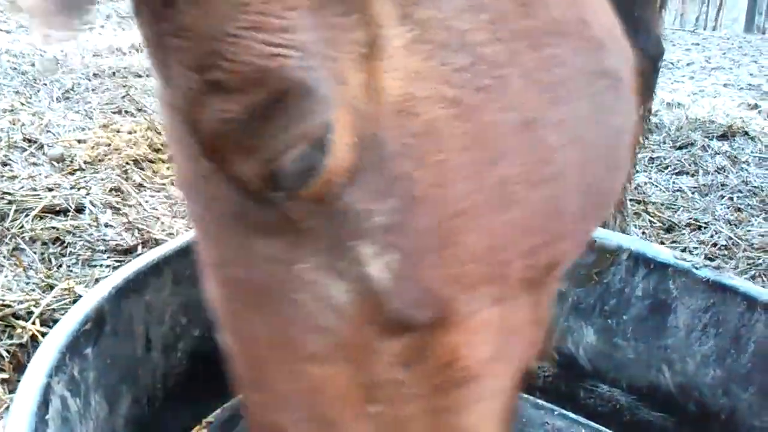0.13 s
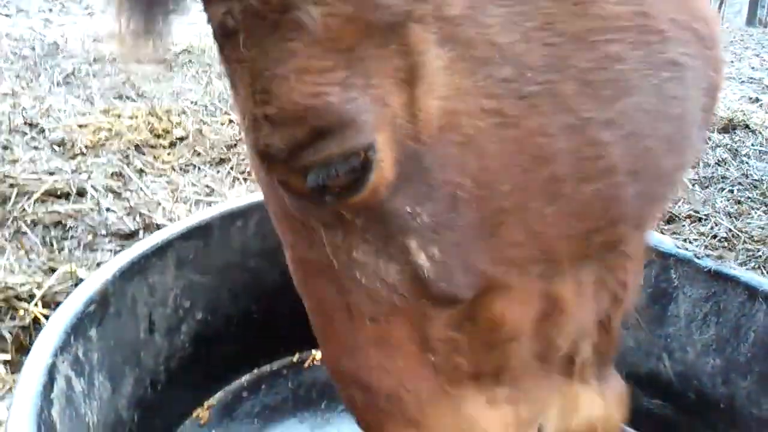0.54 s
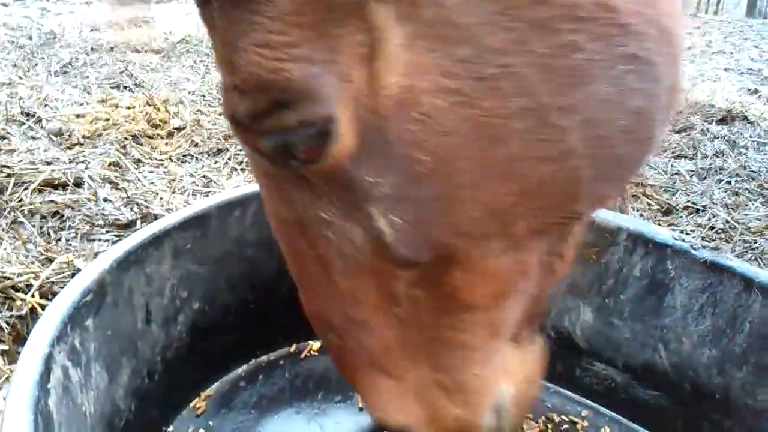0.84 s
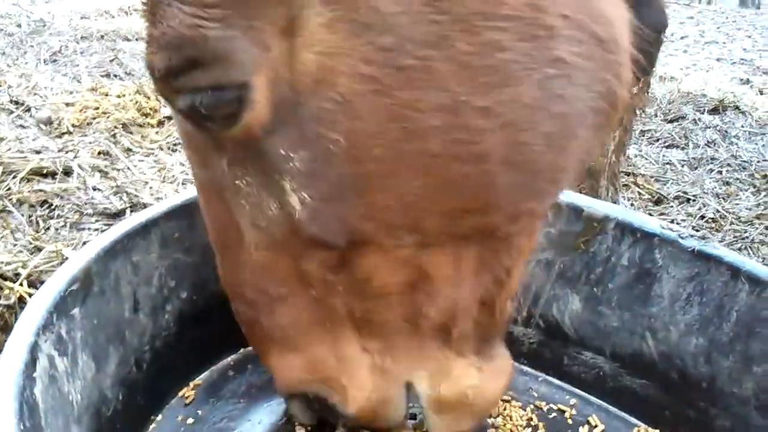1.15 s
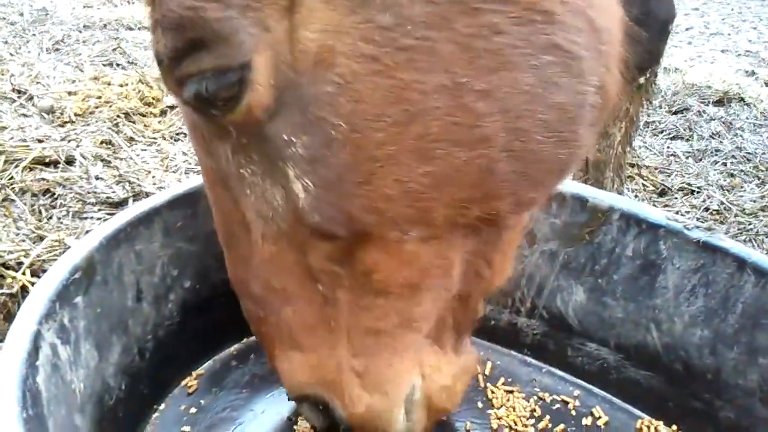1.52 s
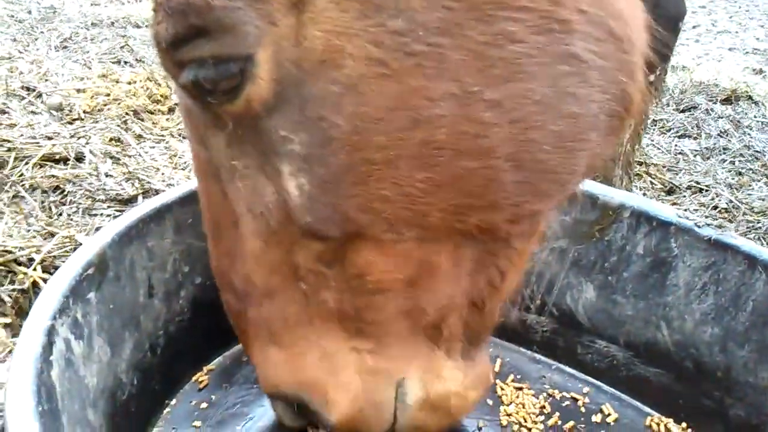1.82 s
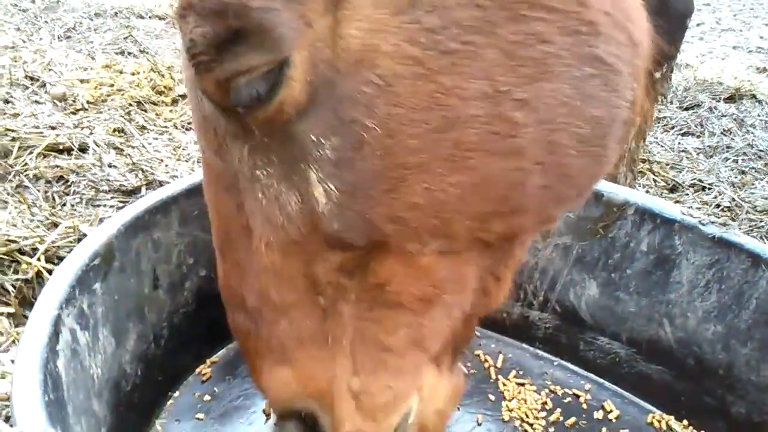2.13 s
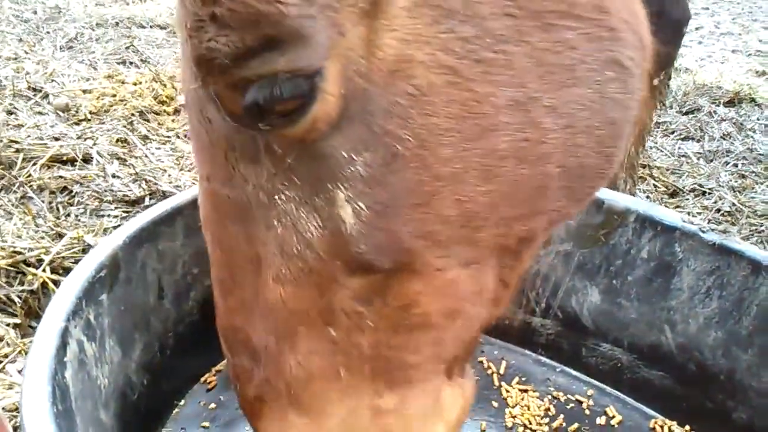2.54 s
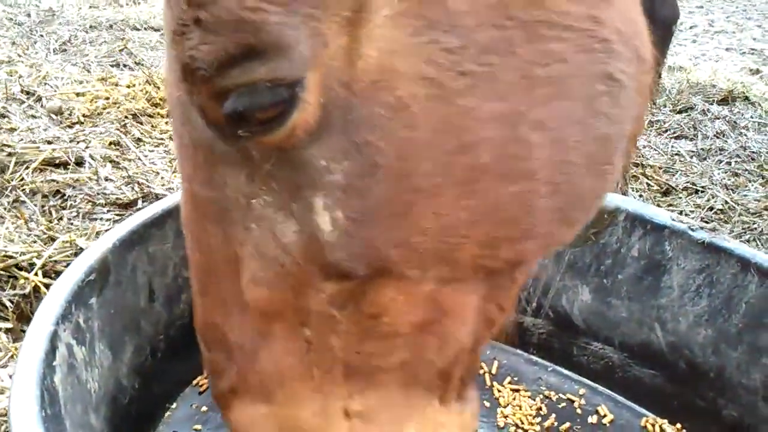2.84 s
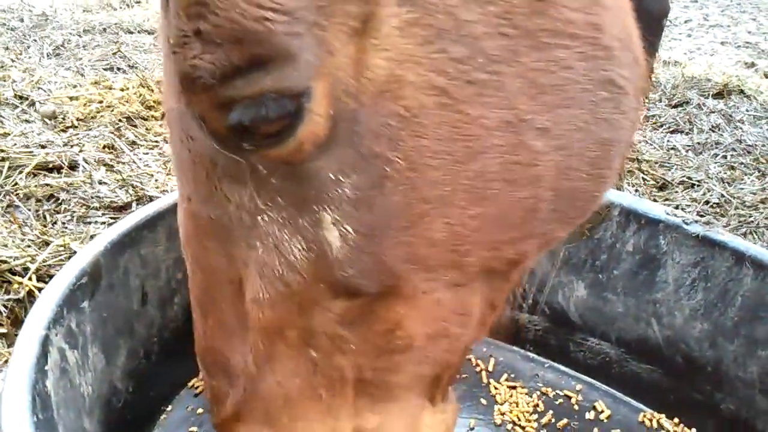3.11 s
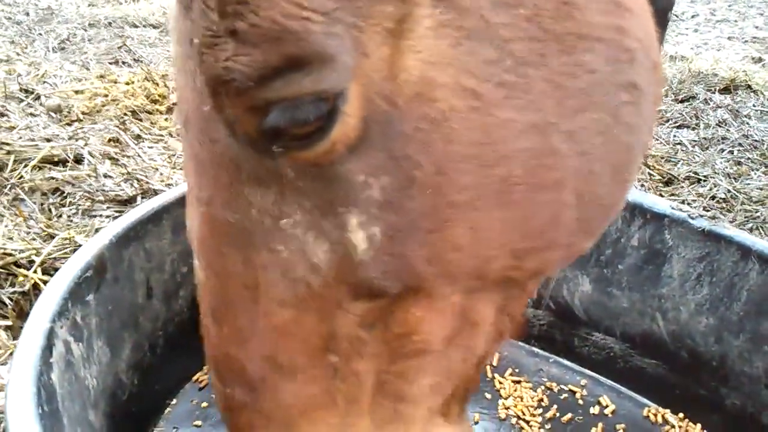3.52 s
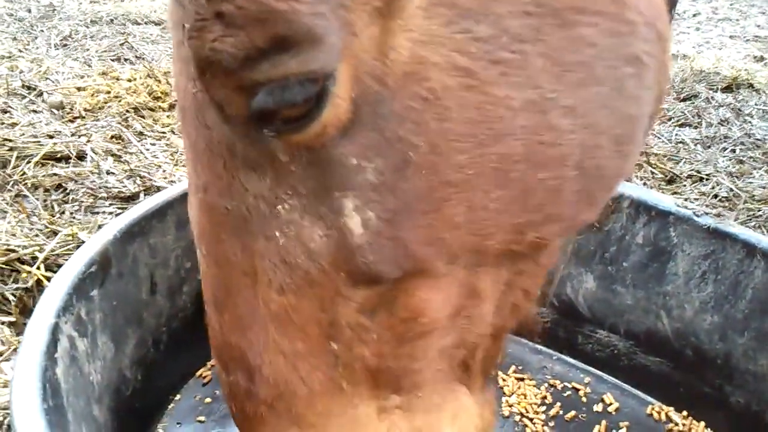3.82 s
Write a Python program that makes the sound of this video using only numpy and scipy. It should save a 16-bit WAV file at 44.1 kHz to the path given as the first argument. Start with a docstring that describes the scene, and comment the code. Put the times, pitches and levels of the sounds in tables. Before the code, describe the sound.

A horse crunches hard feed pellets from a plastic tub, with rattles, scrapes and one knock.

```python
"""Outdoors, close to the microphone: a horse mouths feed pellets off the floor of a plastic tub.
Pellets grind, crush, crack, rattle and tick: random or listed clicks ringing short resonances.
The muzzle rubs, shoves and once bumps the tub floor; one knock, with a bright click, rings the tub.
A thin sine whistles twice in quick succession, gliding up, then down; shaped noise is the air's hiss."""
import sys
import numpy as np
from scipy import signal
from scipy.fft import rfft, irfft
from scipy.io import wavfile

SR = 44100
rng = np.random.default_rng(int(sys.argv[2]) if len(sys.argv) > 2 else 0)


def master_out(mix):
    """Clip the mix to full scale and print it as 16-bit PCM to the path in sys.argv[1]."""
    frames = np.transpose(np.atleast_2d(mix))
    ceiling = np.clip(frames, -1, 1)
    pcm = np.round(ceiling * 32767).astype(np.int16)
    wavfile.write(sys.argv[1], SR, pcm)


def attenuation_scalar(level_db):
    """Turn a level in dB into a linear amplitude multiplier (20 dB per decade)."""
    decades = np.asarray(level_db, float) / 20
    return 10 ** decades


N = 174195


def rms_one(x):
    """Scale to rms 1."""
    return x / np.sqrt(np.mean(x ** 2) + 1e-20)


def in_time(rows):
    """Interpolate curve columns at every sample."""
    s, *columns = np.transpose(rows)
    return [np.interp(np.arange(N) / SR, s, c) for c in columns]


def at_hz(points, hz):
    """Read a spectrum in dB, interpolated over log frequency."""
    points = np.array(points)
    return np.interp(np.log(hz), np.log(points[:, 0]), points[:, 1])


def drift(rate_hz):
    """Slow random wander of rms 1: noise through a two-pole lowpass."""
    r = np.exp(-2 * np.pi * rate_hz / SR)
    wander = signal.lfilter([1], [1, -2 * r, r * r], rng.standard_normal(N + SR))
    return rms_one(wander[SR:])  # first second dropped while the filter settles


def ring(clicks, hz, t60_s):
    """Resonator: a unit click starts a decaying sine of height about 1."""
    r = attenuation_scalar(-60 / (t60_s * SR))
    w = 2 * np.pi * min(hz, SR / 2.2) / SR
    return signal.lfilter([0, np.sin(w)], [1, -2 * r * np.cos(w), r * r], clicks + 1e-18)


def soften(x, contact_s):
    """A soft contact spreads a click in time."""
    r = np.exp(-1 / (contact_s * SR))
    return signal.lfilter([(1 - r) ** 2], [1, -2 * r, r * r], x)


def add(out, start_s, piece):
    """Mix a piece in at its start time."""
    i = int(start_s * SR)
    out[i:i + len(piece)] += piece[:len(out) - i]


def grains(colour, shared, per_s, spread_db, cycles, clump_db, clump_hz, count, size):
    """Clumped random clicks, each ringing at neighbouring pitches, 60 dB down after `cycles`; rms 1."""
    sizes = attenuation_scalar(spread_db * np.minimum(rng.exponential(1, N), 4)) * rng.choice([-1, 1], N)
    clumping = .7 * shared + .7 * drift(clump_hz)
    born = rng.random(N) < per_s * attenuation_scalar(clump_db * clumping) / SR
    pitches_hz = np.geomspace(colour[0][0], colour[-1][0], count)
    dealt = rng.integers(0, count, N)
    out = np.zeros(N)
    for k, hz in enumerate(pitches_hz):
        clicks = sizes * born * (abs(dealt - k) <= size) * rng.normal(0, 1, N)
        tone = rms_one(ring(clicks, hz, cycles / hz))
        out += attenuation_scalar(at_hz(colour, hz)) * tone * np.sqrt(hz)  # bandwidth grows with pitch
    return rms_one(out)


def bursts(rows, t60_s, bits_s, snap_db, snap_hz):
    """Each burst: a main click and later splinters ring at three pitches, plus a broad noise snap."""
    snap_s, snap_contact_s = .0007, .00002
    out = np.zeros(N)
    draws = rng.random((len(rows), 3, 6))
    highpass = signal.butter(1, snap_hz, "high", fs=SR)
    puffs = rng.standard_normal((len(rows), 300)) * np.exp(-np.arange(300) / (snap_s * SR))
    for (start_s, peak_db, hz), (when, size, detune), puff in zip(rows, draws, puffs):
        clicks = np.zeros(SR // 10)
        later_s = -np.log(1 - .95 * when) * bits_s * (np.arange(6) > 0)
        heights = np.where(later_s > 0, (2 * size - 1) * 0.69, 1)
        np.add.at(clicks, (later_s * SR).astype(int), heights)
        body = ring(clicks, hz, t60_s)
        body += 0.22 * ring(clicks, hz * (1.25 + 0.29 * detune[0]), 1.35 * t60_s)
        body -= 0.25 * ring(clicks, hz * (0.73 + 0.12 * detune[1]), 0.79 * t60_s)
        snap = soften(signal.lfilter(puff, [1], clicks), snap_contact_s)
        snap = signal.lfilter(*highpass, snap)
        piece = body / np.abs(body).max() + attenuation_scalar(snap_db) * snap
        add(out, start_s, attenuation_scalar(peak_db) * piece)
    return out


def level(curve, efforts, release_s, column, below_db=0):
    """Slowly changing level plus efforts that rise, hold and fade, summed in power."""
    attack_s = 0.0035
    t = np.arange(N) / SR
    power = attenuation_scalar(2 * in_time(curve)[0])
    for row in efforts:
        start_s, length_s = row[:2]
        rise = np.clip((t - start_s) / attack_s, 0, 1)
        fade = np.exp(-np.maximum(t - start_s - length_s, 0) / release_s)
        power = power + (attenuation_scalar(row[column] + below_db) * rise * fade) ** 2
    return np.sqrt(power)


# air spectrum: freq_hz, density_db (relative, per Hz)
AIR_COLOUR = [(25, -31), (55, -2.5), (250, -6.5), (850, -9.5), (1710, -14.5), (2630, -25), (4150, -9),
              (4870, -18.5), (6210, -11), (8350, -20), (15500, -17)]
# air level: time_s, level_db
AIR_LEVEL = [(0, -51.5), (1, -50.5), (1.3, -47.5), (3.95, -45.5)]


def air():
    """Open-air hiss and rumble: spectrally shaped noise, slowly swelling."""
    hz = np.maximum(np.fft.rfftfreq(N, 1 / SR), 1)
    spectrum = rfft(rng.standard_normal(N)) * attenuation_scalar(at_hz(AIR_COLOUR, hz))
    return attenuation_scalar(in_time(AIR_LEVEL)[0]) * rms_one(irfft(spectrum, N))


# two whistle glides, parted by a dip: time_s, pitch_hz, level_db
WHISTLE_GLIDES = [(2.45, 8300, -62), (2.57, 8950, -62), (2.63, 9850, -57), (2.65, 9900, -80),
                  (2.675, 8600, -58), (2.72, 8050, -57), (2.765, 8040, -51), (2.81, 8000, -66)]


def whistle():
    """Faint sine of wavering level, gliding up, then down after a dip."""
    pitch_hz, level_db = in_time(WHISTLE_GLIDES)
    t = np.arange(N) / SR
    on = (t > WHISTLE_GLIDES[0][0]) & (t < WHISTLE_GLIDES[-1][0])
    sine = np.sin(2 * np.pi * np.cumsum(pitch_hz) / SR) * np.sqrt(2)  # rms 1
    return on * attenuation_scalar(level_db + 2.5 * drift(40)) * sine


# tub wall modes: pitch_hz, level_db (relative), t60_s
TUB_MODES = [(665, 16, 0.036), (803, 16.5, 0.034), (1060, 15, 0.038)]


def knock():
    """One firm blow rings the tub wall modes."""
    start_s, peak_db, contact_s = 1.3683, -11, .0002
    out = np.zeros(N)
    blow = soften(np.eye(1, SR // 5)[0], contact_s)
    rings = sum(attenuation_scalar(db) * ring(blow, hz, t60_s) for hz, db, t60_s in TUB_MODES)
    rings = signal.lfilter(*signal.butter(2, 350, "high", fs=SR), rings)
    add(out, start_s, attenuation_scalar(peak_db) * rings / np.abs(rings).max())
    return out


# slowly changing rub level beneath the shoves: time_s, level_db
RUB_LEVEL = [(0, -48.5), (.5, -55), (.65, -52), (.9, -40.5), (1.3, -50), (1.7, -41.5), (2.55, -51.5),
             (3.1, -44), (3.95, -59.5)]
# rub spectrum: freq_hz, density_db (relative)
RUB_COLOUR = [(170, -10), (205, -2.5), (260, -0.5), (340, -7)]
# muzzle shoves on the tub floor: start_s, length_s, level_db
SHOVES = [(0.148,0.071,-41), (0.3,0.25,-41.5), (0.754,0.022,-31.5), (0.951,0.078,-37), (1.409,0.038,-41),
          (1.567,0.038,-33), (1.803,0.086,-37.5), (2.41,0.027,-41.5), (2.616,0.063,-44), (2.67,0.055,-43),
          (3.008,0.026,-34.5), (3.444,0.051,-35.5), (3.849,0.017,-37.5)]


def rub(jaw):
    """Muzzle on the tub floor: low grains dulled by soft contact, louder in shoves."""
    rubbing = grains(RUB_COLOUR, jaw, per_s=470, spread_db=2.0, cycles=25.0,
                     clump_db=1.0, clump_hz=12, count=7, size=1)
    rubbing = rms_one(soften(rubbing, contact_s=0.00045))
    return level(RUB_LEVEL, SHOVES, release_s=0.012, column=2) * rubbing


# slowly changing rattle level beneath the bites: time_s, level_db
RATTLE_LEVEL = [(0, -54), (.5, -46), (1.05, -53), (1.12, -48), (1.6, -48.5), (2.6, -43.5), (3.95, -48)]
# rattle spectrum: freq_hz, density_db (relative)
RATTLE_COLOUR = [(4900, -10), (5600, -4), (6700, -1), (7500, -11.5), (10000, -11), (15500, -14)]
# jaws close on a mouthful (rattle, crush, grind): start_s, length_s, grind_db, crush_db
BITES = [(0.122,0.047,-52,-42), (.227,0.12,-39,-41.5), (0.326,0.11,-32.5,-32), (0.427,0.027,-27,-23),
         (0.449,0.049,-34,-37.5), (1.097,0.064,-49,-39.5), (1.161,0.072,-40,-33.5), (1.568,0.041,-39,-45),
         (1.725,0.051,-44,-38), (1.783,0.046,-38,-34), (2.12,.11,-40,-47.5), (2.266,0.045,-40.5,-41.5),
         (2.4,0.069,-42.5,-43), (2.627,0.045,-36.5,-36.5), (2.77,0.041,-35,-42), (2.992,0.062,-34.5,-37.5),
         (3.075,0.099,-36.5,-42.5), (3.323,0.11,-40.5,-53), (3.449,0.032,-39,-48), (3.607,0.094,-41,-54)]
BITE_RELEASE_S = 0.0063


def rattle(jaw):
    """Loose pellets stirred by each bite, below its crushing: bright grains."""
    stirred = level(RATTLE_LEVEL, BITES, BITE_RELEASE_S, column=3, below_db=-10.5)
    return stirred * grains(RATTLE_COLOUR, jaw, per_s=1400, spread_db=3.0, cycles=50,
                            clump_db=4.5, clump_hz=70.3, count=14, size=3)


# pellet ticks, and the bright click of the tub knock: start_s, peak_db (of the ringing), pitch_hz
TICKS_AND_KNOCK_CLICK = [(.0334,-29,4230), (.128,-27,6000), (.1452,-26.5,5760), (.2365,-26,6570),
                         (.3343,-20.5,3700), (.428,-14.5,5570), (.4462,-8.5,3300), (.4935,-20,6040),
                         (.605,-27,5540), (.875,-25.5,14700), (1.1015,-27.5,6370), (1.2235,-22,3600),
                         (1.3685,-28.5,9000), (1.478,-24,5100), (1.6883,-24,4070), (1.701,-22,6370),
                         (1.7945,-11.5,4200), (1.8529,-28,6300), (1.8933,-27,6180), (1.9922,-21.5,12100),
                         (2.5232,-25.5,4050), (2.955,-22.5,2940), (3.0365,-16,3620), (3.1017,-24.5,4270),
                         (3.4395,-27.5,6850), (3.6726,-19.5,5800), (3.7798,-25.5,4500)]


def ticks_and_knock_click():
    """Pellet ticks, and the bright click of the tub knock: short, high rings."""
    return bursts(TICKS_AND_KNOCK_CLICK, t60_s=0.0076, bits_s=0.0013, snap_db=-8.5, snap_hz=7200)


# pellet cracks, and one low bump of the muzzle on the tub: start_s, peak_db (of the ringing), pitch_hz
CRACKS_AND_BUMP = [(.054,-31,990), (.238,-27,940), (0.2964,-21,885), (.366,-19.5,900), (.397,-19,1720),
                   (.4131,-18,1060), (0.43,-14,2050), (.446,-11.5,2260), (0.6126,-18.5,867),
                   (0.6791,-20,766), (.7305,-22.5,1505), (0.9527,-20.5,1500), (0.985,-21,616),
                   (.9385,-28,1760), (1.139,-22,1800), (1.179,-26,1850), (1.231,-18,1930),
                   (1.437,-23.5,1890), (1.7355,-25.5,1280), (1.7435,-26,1690), (1.7535,-21,1710),
                   (1.817,-23.5,1580), (2.1613,-20,1280), (2.522,-25,1010), (2.632,-21,700),
                   (2.6381,-14.5,995), (2.6605,-23,1100), (2.9542,-18,1190), (2.9741,-20.5,1060),
                   (3.014,-22,340), (3.033,-19,950), (3.3776,-25,2030), (3.676,-22,920)]


def cracks_and_bump():
    """Pellet cracks, and one low bump of the muzzle on the tub: longer, lower rings with a snap."""
    return bursts(CRACKS_AND_BUMP, t60_s=0.013, bits_s=0.000997, snap_db=-9.5, snap_hz=1500)


# slowly changing crush level beneath the bites: time_s, level_db
CRUSH_LEVEL = [(0, -53.5), (.55, -40.5), (.8, -48.5), (1.05, -46.5), (1.5, -43.5), (2.75, -46.5),
               (3.2, -44.5), (3.95, -47.5)]
# crush spectrum: freq_hz, density_db (relative)
CRUSH_COLOUR = [(1300, -5), (1800, 1.5), (2300, -10), (3000, -7.5), (3600, -6.5), (4250, -2.5), (5000, -15)]


def crush(jaw):
    """Pellets crushed between the teeth: dense mid-high grains."""
    pressed = level(CRUSH_LEVEL, BITES, BITE_RELEASE_S, column=3)
    return pressed * grains(CRUSH_COLOUR, jaw, per_s=1500, spread_db=3.0, cycles=68,
                            clump_db=1.5, clump_hz=38.3, count=18, size=2)


# slowly changing grind level beneath the bites: time_s, level_db
GRIND_LEVEL = [(0, -48.5), (.55, -42), (.8, -46.5), (1.1, -42), (2.5, -47.5), (3, -40), (3.68, -47.5),
               (3.72, -53), (3.95, -48.5)]
# grind spectrum: freq_hz, density_db (relative)
GRIND_COLOUR = [(400, -3), (620, 1.5), (780, -2), (930, 3), (1120, -3.5), (1350, -5)]


def grind(jaw):
    """Pellets ground in the mouth: lower, sparser grains."""
    pressed = level(GRIND_LEVEL, BITES, BITE_RELEASE_S, column=2)
    return pressed * grains(GRIND_COLOUR, jaw, per_s=900, spread_db=2.0, cycles=21.3,
                            clump_db=3.0, clump_hz=29.37, count=14, size=1)


def scene():
    """All sources, one channel; one jaw drift clumps all the grains together."""
    jaw = drift(35)
    near = rub(jaw) + rattle(jaw) + crush(jaw) + grind(jaw)
    near = near + knock() + ticks_and_knock_click() + cracks_and_bump()
    bass_cut = signal.butter(3, 131, "high", fs=SR, output="sos")
    near = signal.sosfilt(bass_cut, near)
    return (air() + whistle() + near)[None]


def band_limit(x):
    """A steep low-pass at the top of the band."""
    return signal.sosfilt(signal.butter(12, 16850, fs=SR, output="sos"), x)


def record(dry):
    """Steep lowpass removes the top."""
    top_cut = signal.cheby2(14, 30, 15850, fs=SR, output="sos")
    mix = signal.sosfilt(top_cut, dry)
    return band_limit(mix)


dry = scene()
out = record(dry)
master_out(out)
```